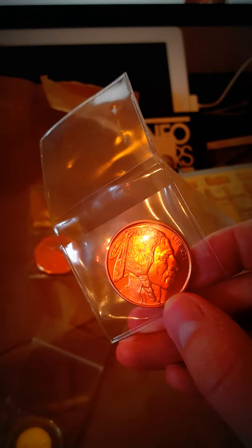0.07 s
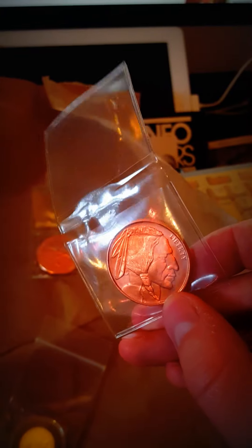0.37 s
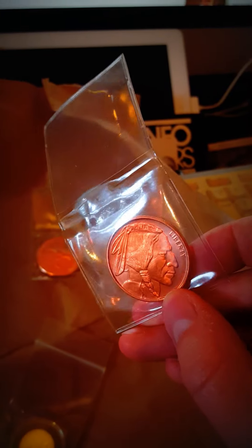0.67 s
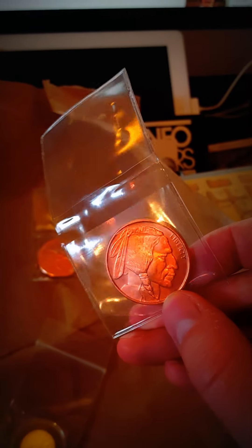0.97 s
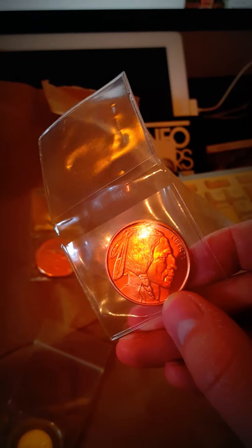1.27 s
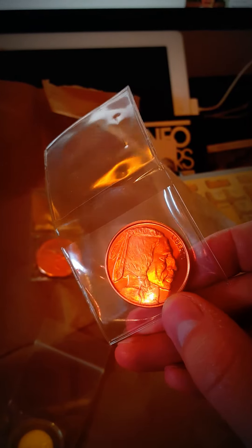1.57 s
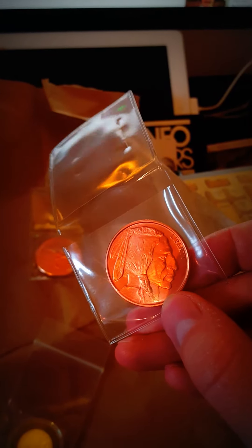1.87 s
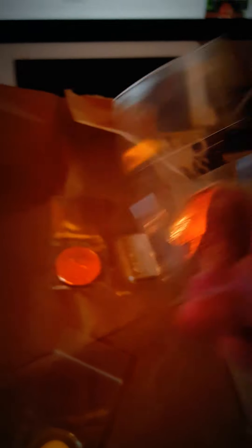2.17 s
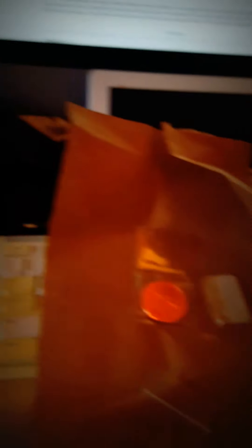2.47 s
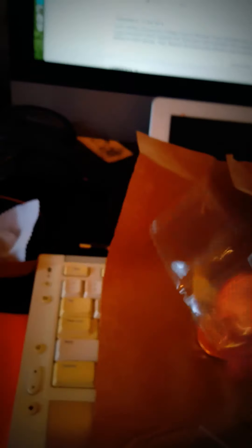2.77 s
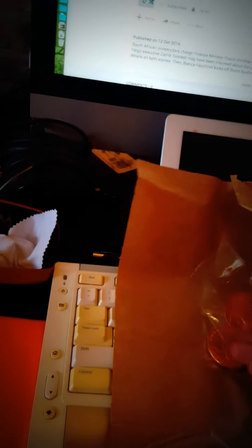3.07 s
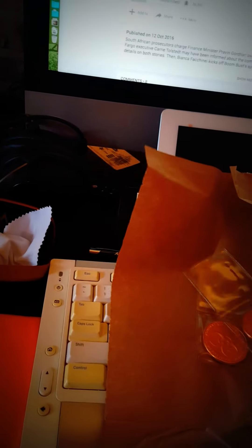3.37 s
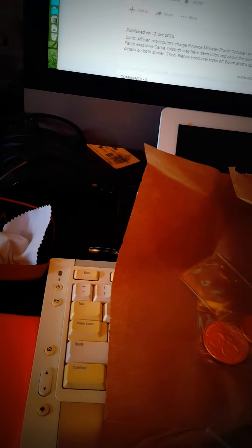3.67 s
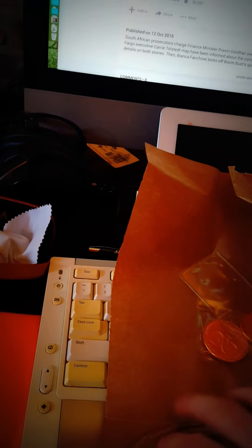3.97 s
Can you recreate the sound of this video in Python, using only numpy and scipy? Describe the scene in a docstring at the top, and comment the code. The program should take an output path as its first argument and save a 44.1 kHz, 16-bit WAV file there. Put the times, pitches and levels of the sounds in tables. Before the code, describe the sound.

Plastic crinkles and a light knock as a sleeved coin is set down on a desk.

```python
"""At a desk in a small room, a coin in a stiff plastic sleeve is laid on a paper envelope, close to a
two-port microphone. After a near-still wait the sleeve touches down: its creases snap, its wall buckles
and it slides by stick-slip friction. The coin drops the last bit, knocks the desk and clinks briefly,
damped by the plastic. The room reverberates over mains hum, a fan and faint hiss."""
import sys
import numpy as np
from scipy import signal
from scipy.fft import rfft, irfft, next_fast_len
from scipy.io import wavfile
from scipy.ndimage import map_coordinates

SR = 44100
rng = np.random.default_rng(int(sys.argv[2]) if len(sys.argv) > 2 else 0)


def materialize(psi):
    """Save the field psi as 16-bit PCM at rate SR to the path in sys.argv[1].

    A 1-D psi becomes a single channel; in a 2-D psi each row is a channel.
    """
    bounded = np.clip(np.atleast_2d(psi).T, -1, 1)
    quanta = np.round(bounded * 32767).astype(np.int16)
    wavfile.write(sys.argv[1], SR, quanta)


N = 176400

# Mains and fan tones. Each row: frequency in Hz, level in dB.
HUM_LINES = [(59.5, -70.5), (118.2, -78), (120, -66.5), (171, -71), (202, -59.5), (404, -71.5), (1061, -83),
             (1119, -78.5), (1238, -84.5)]
# Fan rush and hiss. Each row: frequency in Hz, relative level in dB.
AIR_SPECTRUM = [(25, -20), (50, -6.5), (90, -10), (150, -4.5), (250, 1), (350, -1), (500, -6), (750, -13),
                (1150, -15.5), (1400, -17.5), (3000, -24), (6000, -31), (10000, -34), (13000, -32),
                (15800, -30)]
# Likeness of that noise at the two ports. Each row: frequency in Hz, correlation.
AIR_CORRELATION = [(60, 0.46), (250, 0.93), (640, 0.41), (1400, 0)]
# Reverberation time. Each row: frequency in Hz, T60 (time to fall 60 dB) in seconds.
ROOM_T60 = [(150, 0.34), (1500, 0.58), (6800, 0.47), (15000, 0.26)]
# Colour of the reverberation. Each row: frequency in Hz, gain in dB.
ROOM_COLOUR = [(150, -11), (850, -11.5), (1700, -11.5), (4000, -11), (6800, -13.5), (8500, -8.5),
               (14000, -14)]
# The room's share, easing as the sleeve moves. Each row: time in seconds, gain in dB.
ROOM_SHARE = [(3.0, 1.5), (3.5, 0.5)]
# Level difference of the ports. Each row: frequency in Hz, left minus right in dB.
PORT_BALANCE = [(300, -1.5), (1200, -3), (1900, -8.5), (2900, 7.5), (4450, -7.5), (6050, 10), (6950, -4.5),
                (10500, 8), (15000, 5)]
# Phase difference of the ports. Each row: frequency in Hz, lead of the left in radians.
PORT_PHASE = [(300, -0.5), (900, 0.5), (1750, -0.1), (2700, 3.5), (3800, 4.5), (4800, 7), (6050, 9.5),
              (7000, 11), (7900, 13.5), (12000, 14)]
# Modes of the padded desk. Each row: frequency in Hz, relative level in dB, T60 in seconds.
DESK_MODES = [(86.5, -26, 0.059), (182, -24, 0.068), (316, -13, 0.02), (565, -23, 0.067), (857, 2.5, 0.019),
              (1066, -4.5, 0.022), (1274, -10, 0.022), (1596, -1.5, 0.018), (1882, -6, 0.016)]
# Blows on the desk. Each row: start in seconds, gain in dB, rise in seconds, tilt in dB per octave.
KNOCKS = [(3.002, -22.5, 0.0022, -2.5), (3.4923, -31.5, 0.0007, 8), (3.5024, -31, 0.00052, 16)]
# The sleeve's hollow body, crack and swish. Each row: frequency in Hz, relative level in dB.
BODY_SPECTRUM = [(100, -12.5), (300, -3.5), (600, -10), (900, 1.5), (1300, -6), (1800, -1.5), (2100, -15),
                 (2600, -6.5), (5000, -39)]
CRACK_SPECTRUM = [(500, -27), (2000, 8), (3200, 9.5), (4300, 7), (6000, 7), (8000, -2), (10500, -0.5),
                  (13000, -5.5), (16000, -8)]
SWISH_SPECTRUM = [(2000, -20), (4500, -7), (5300, 3), (6400, 2), (7400, -9), (9800, -15), (11300, -9),
                  (13000, -18), (16000, -24)]
# Slides on paper. Each row: start and length in seconds, body and swish levels in dB.
RUBS = [(3.162, .042, -55, -57), (3.308, .022, -54, -74), (3.338, .036, -55, -51), (3.372, .028, -42, -53),
        (3.395, .06, -53, -63), (3.451, .024, -53, -50)]
# Creases snapping. Each row: start in seconds, body and crack levels in dB.
SNAPS = [(1.007, -60.5, -72), (2.9905, -35, -41.5), (2.9965, -43, -36.5), (2.9995, -44, -37.5),
         (3.0115, -36.5, -54), (3.027, -45, -45.5), (3.033, -44, -61), (3.082, -72, -54.5),
         (3.1605, -45.5, -43.5), (3.177, -44, -49), (3.2225, -51.5, -53), (3.3885, -55, -39.5),
         (3.397, -40, -43), (3.4143, -32.5, -40.5), (3.426, -44, -49), (3.437, -43, -48), (3.467, -41, -44),
         (3.4855, -36, -46), (3.4906, -37, -36.5), (3.499, -39, -39), (3.5003, -37.5, -28.5),
         (3.5028, -31.5, -24.5), (3.5065, -30.5, -48), (3.517, -38.5, -54), (3.553, -41, -51)]
# Modes of the sleeve's wall. Each row: frequency in Hz, relative level in dB, T60 in seconds.
WALL_MODES = [(1694, -1, 0.018), (1836, -13, 0.018), (1980, -9, 0.0078)]
# The wall buckling. Each row: start in seconds, gain in dB, pitch ratio.
BUCKLES = [(3.005, -36, 1.06), (3.2224, -37, 1), (3.378, -33.5, 1.3), (3.397, -30.5, 1.1),
           (3.4857, -32, 0.98), (3.5028, -25.5, 1.1)]
# Modes of the sleeved coin. Each row: frequency in Hz, relative level in dB, T60 in seconds.
COIN_MODES = [(6514, -5, .022), (6842, 3, .028), (7030, 0, .022), (7434, -9, .016), (11290, -5, .018),
              (11620, -7, .016), (11770, -2, .019), (15250, -8, .012)]
# The coin's contacts. Each row: start in seconds, gain in dB.
CLINKS = [(3.4999, -26), (3.503, -29)]

SHARP_RISE_S = 0.00038
HALF_EACH_SIDE = np.array([[0.5], [-0.5]])  # splits a left-minus-right difference
TIME = np.arange(N) / SR


def amp(db):
    """Decibels to amplitude ratio."""
    return 10 ** (np.asarray(db) / 20)


def unit_rms(x):
    """Normalise to rms 1."""
    return x / np.sqrt(np.mean(x ** 2) + 1e-20)


def along(points, hz):
    """Interpolate (Hz, value) points on a logarithmic frequency axis."""
    knots_hz, values = np.transpose(points)
    return np.interp(np.log(hz + 1), np.log(knots_hz + 1), values)


def wobble(knots_per_s):
    """A smooth curve through random knots."""
    knots = rng.standard_normal(int(N * knots_per_s / SR) + 4)
    return map_coordinates(knots, [TIME * knots_per_s])


def filtered(x, response):
    """Multiply the spectrum by a frequency response."""
    size = next_fast_len(N + SR // 2)
    return irfft(rfft(x, size) * response(np.fft.rfftfreq(size, 1 / SR)), size)[..., :N]


def coloured(x, spectrum):
    """Spectral shaping, normalised to rms 1."""
    return unit_rms(filtered(x, lambda hz: amp(along(spectrum, hz))))


def impulses(per_s):
    """Shot noise: independent impulses of random strength."""
    return (rng.random(N) < per_s / SR) * rng.standard_normal(N)


def add(track, start_s, sound):
    """Superpose a sound on the track."""
    part = track[round(start_s * SR):][:len(sound)]
    part += sound[:len(part)]


def ring(modes, rise_s=SHARP_RISE_S, tilt_db=0):
    """Free vibration: a sum of damped modes, tilted by tilt_db per octave about 1 kHz."""
    t = np.arange(SR // 2) / SR
    out = np.zeros(len(t))
    for hz, db, t60 in modes:
        decay = amp(db + tilt_db * np.log2(hz / 1000) - 60 * t / t60)
        out += decay * np.sin(2 * np.pi * (hz * t + rng.random()))
    return out * (1 - np.exp(-t / rise_s))


def hum_and_fan(flutter_db=1, drift_rad=0.3, air_db=-61, balance_db=-0.73):
    """Weakly modulated mains and fan tones lie over partly correlated broadband noise."""
    def mid_side_gains(hz):
        angle = np.arccos(along(AIR_CORRELATION, hz)) / 2
        return amp(along(AIR_SPECTRUM, hz)) * [np.cos(angle), np.sin(angle)]

    hum = np.zeros(N)
    for hz, db in HUM_LINES:
        level = amp(db + flutter_db * wobble(6.88))
        hum += level * unit_rms(np.sin(2 * np.pi * hz * TIME + drift_rad * wobble(6)))
    mid, side = filtered(rng.standard_normal((2, N)), mid_side_gains)
    air = amp(air_db) * unit_rms(np.array([mid + side, mid - side]))
    return (hum + air) * amp(balance_db * HALF_EACH_SIDE)


def reverberation(x, delay_s=0.005):
    """A diffuse field decays exponentially, each frequency at its own rate."""
    hz, t, noise = signal.stft(rng.standard_normal((2, SR * 3 // 4)), SR, nperseg=256)
    decay = amp(-60 * t / along(ROOM_T60, hz)[:, None])
    tail = signal.istft(noise * decay, SR, nperseg=256)[1]
    send = filtered(x, lambda hz: amp(along(ROOM_COLOUR, hz)))
    delayed = np.pad(send, (round(delay_s * SR), 0))
    return signal.fftconvolve(delayed[None], tail / np.linalg.norm(tail[0]), axes=1)[:, :N]


def early_reflections(x, count=6, span_s=(0.001, 0.011), gain_db=-9):
    """Reflection from desk and screen brings each port its own weak, delayed copies."""
    out = np.zeros((2, N))
    for port, delays in zip(out, rng.uniform(*span_s, (2, count))):
        for delay_s in delays:
            add(port, delay_s, rng.choice([-1, 1]) * x)
    return amp(gain_db) * out / np.sqrt(count)


def ports(x):
    """In the near field the two ports receive each frequency at different levels and phases."""
    def response(hz):
        gain = amp(HALF_EACH_SIDE * along(PORT_BALANCE, hz))
        return gain * np.exp(1j * HALF_EACH_SIDE * along(PORT_PHASE, hz))

    return filtered(x, response)


def low_cut(x, corner_hz=67):
    """A high-pass filter keeps deep rumble and DC offset out of the sleeve's sounds and the knocks."""
    return signal.sosfilt(signal.butter(4, corner_hz, "highpass", fs=SR, output="sos"), x)


def desk_knocks():
    """The coin's impact through the envelope excites the modes of the desk."""
    out = np.zeros(N)
    for start_s, db, rise_s, tilt_db in KNOCKS:
        add(out, start_s, amp(db) * ring(DESK_MODES, rise_s, tilt_db))
    return out


def sleeve_rubs(slips_per_s=4000, fade_s=0.011):
    """Stick-slip friction of plastic on paper gives a hollow scrape and a bright swish."""
    out = np.zeros(N)
    for layer, spectrum in enumerate([BODY_SPECTRUM, SWISH_SPECTRUM]):
        friction = unit_rms(impulses(slips_per_s)) + rng.standard_normal(N)
        scrape = coloured(friction, spectrum)
        for start_s, length_s, *levels in RUBS:
            inside_s = np.minimum(TIME - start_s, start_s + length_s - TIME)
            out += amp(levels[layer]) * np.clip(inside_s / fade_s, 0, 1) * scrape
    return out


def sleeve_crinkle(start_s=3.376, length_s=0.021, end_db=-41, swell_db=6, cracks_per_s=2500):
    """Pressed flat, the sleeve emits ever stronger tiny cracks that merge into shot noise."""
    progress = (TIME - start_s) / length_s
    swell = amp(end_db + swell_db * (np.clip(progress, 0, 1) - 1))
    pressed = (progress > 0) & (progress < 1)
    return swell * pressed * coloured(impulses(cracks_per_s), CRACK_SPECTRUM)


def crease_snaps(body_t60_s=0.015, crack_t60_s=0.01):
    """Each crease releases elastic energy as a hollow pop and a shorter, bright crack."""
    out, t = np.zeros(N), np.arange(SR // 20) / SR
    for layer, (spectrum, t60) in enumerate([(BODY_SPECTRUM, body_t60_s), (CRACK_SPECTRUM, crack_t60_s)]):
        noise = coloured(rng.standard_normal(N), spectrum)
        shape = amp(-60 * t / t60) * (1 - np.exp(-t / SHARP_RISE_S))
        shape /= shape.max()
        for k, (start_s, *levels) in enumerate(SNAPS):
            burst = noise[k * len(t):][:len(t)] * shape
            burst *= np.linalg.norm(shape) / np.linalg.norm(burst)  # equal energy before the gain
            add(out, start_s, amp(levels[layer]) * burst)
    return out


def wall_buckles():
    """Buckling sets the sleeve's wall ringing in its modes: a pitched tick."""
    out = np.zeros(N)
    for start_s, db, pitch in BUCKLES:
        modes = [(hz * pitch, level, t60) for hz, level, t60 in WALL_MODES]
        add(out, start_s, amp(db) * ring(modes))
    return out


def coin_clinks():
    """Two impacts excite the coin's plate modes, which the sleeve damps quickly."""
    out = np.zeros(N)
    for start_s, db in CLINKS:
        add(out, start_s, amp(db) * ring(COIN_MODES))
    return out


def scene(coin_room_db=0.5):
    """Direct sound, reflections and background superpose; each source's spot has its own room tail."""
    sleeve = low_cut(crease_snaps() + wall_buckles() + sleeve_rubs() + sleeve_crinkle())
    desk = low_cut(desk_knocks())
    coin = coin_clinks()
    direct = sleeve + desk + coin
    reflections = early_reflections(direct)
    share = amp(np.interp(TIME, *np.transpose(ROOM_SHARE)))
    tails = sum(reverberation(share * x) for x in (sleeve, desk, amp(coin_room_db) * coin))
    return ports(direct) + reflections + tails + hum_and_fan()


def record(dry, top_hz=15900):
    """An ideal low-pass filter limits the bandwidth."""
    return filtered(dry, lambda hz: hz < top_hz)


dry = scene()
out = record(dry)
materialize(out)
```